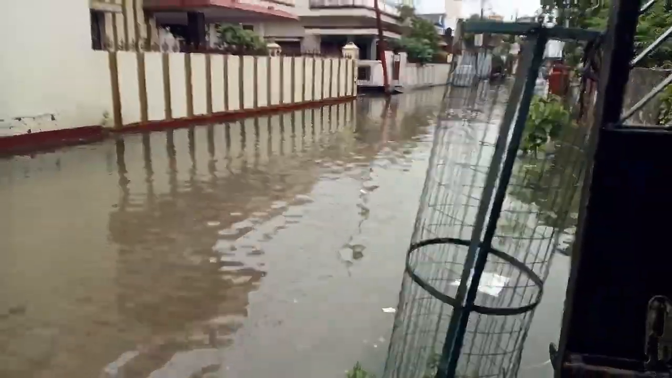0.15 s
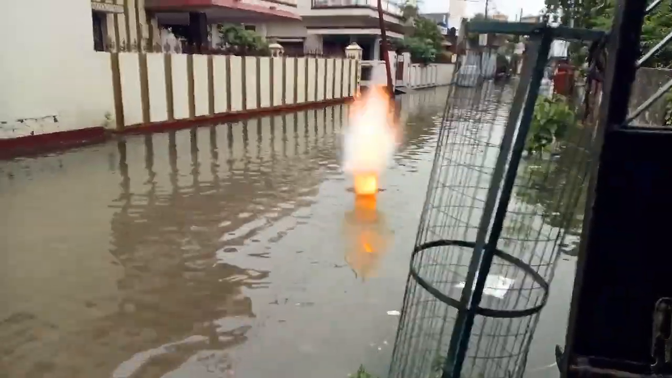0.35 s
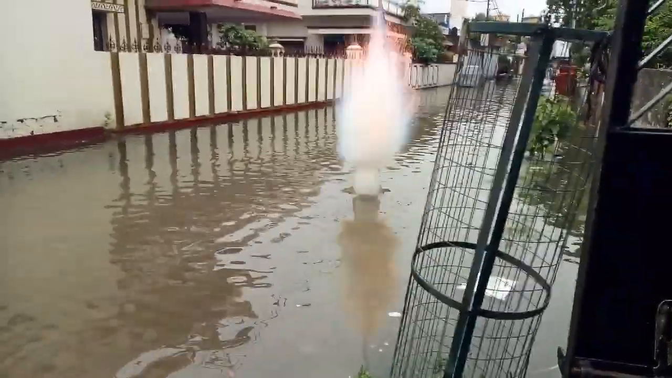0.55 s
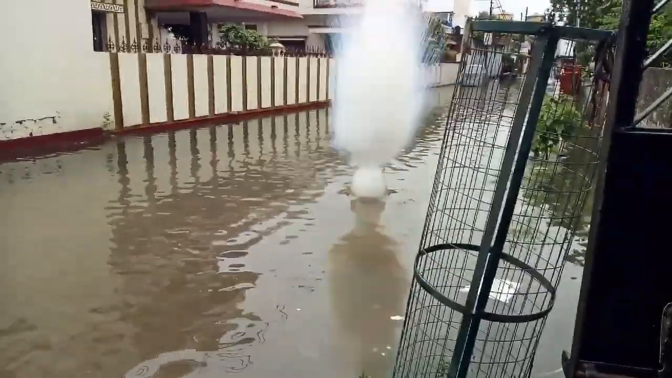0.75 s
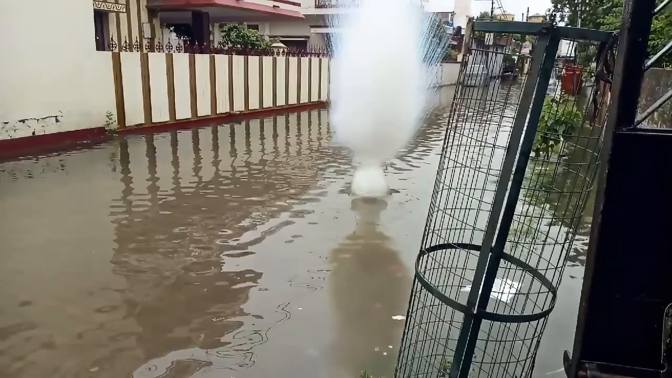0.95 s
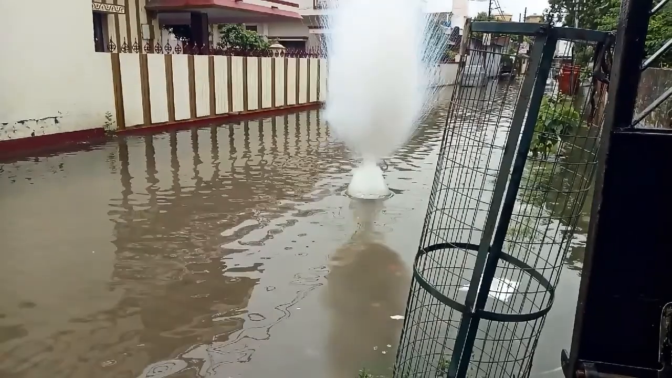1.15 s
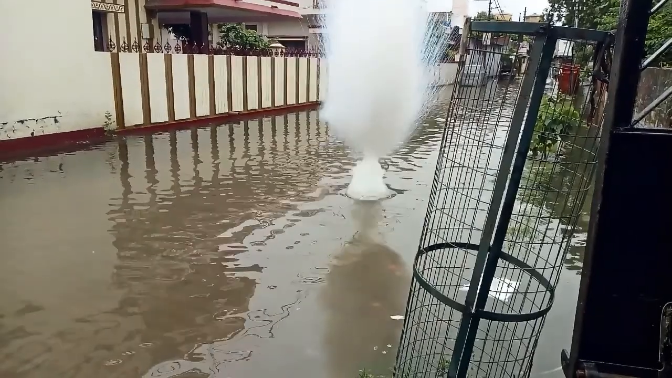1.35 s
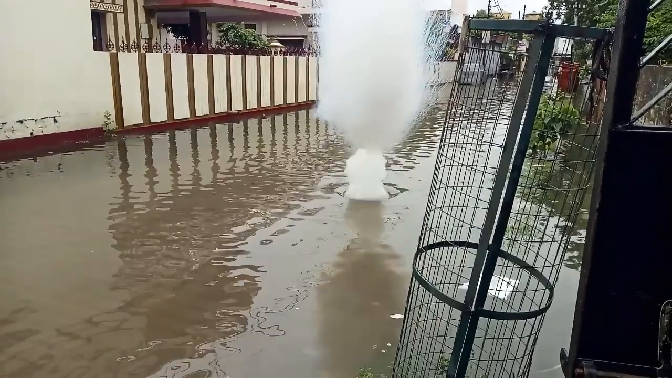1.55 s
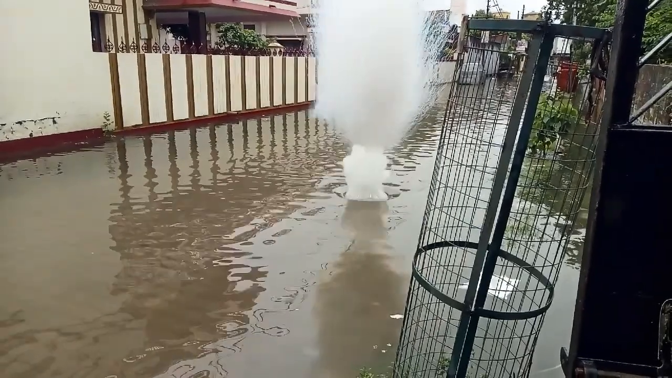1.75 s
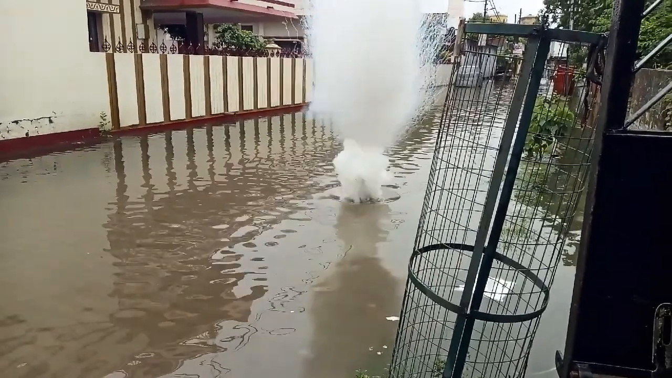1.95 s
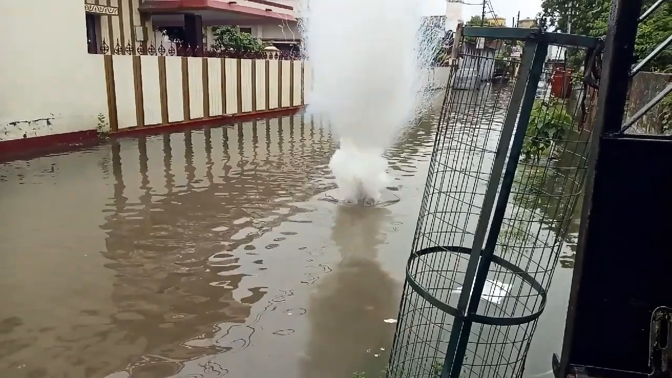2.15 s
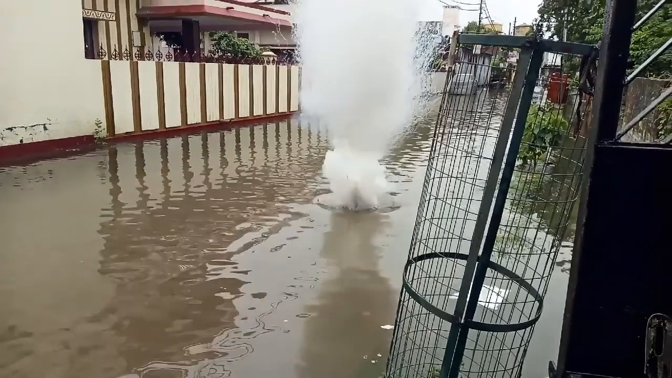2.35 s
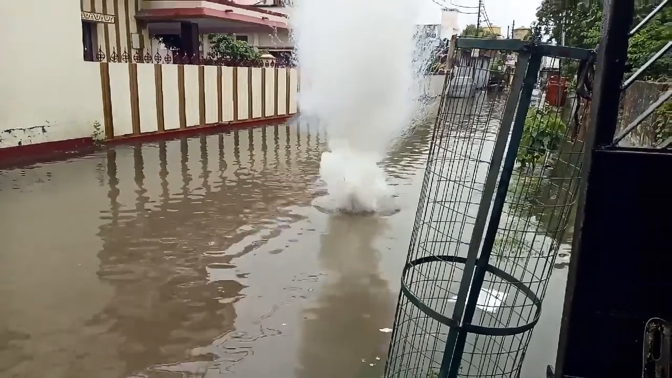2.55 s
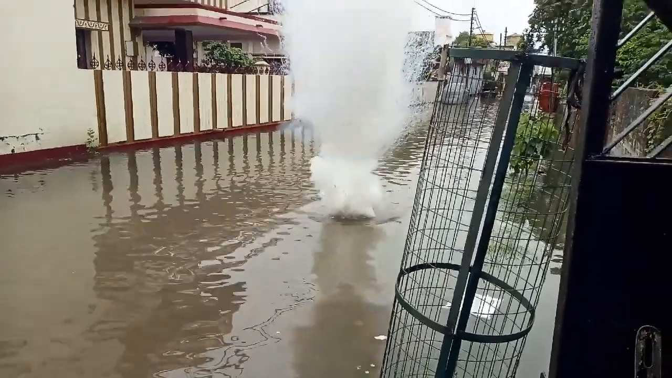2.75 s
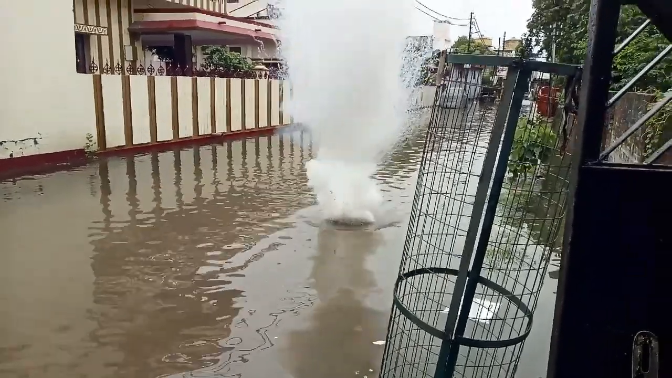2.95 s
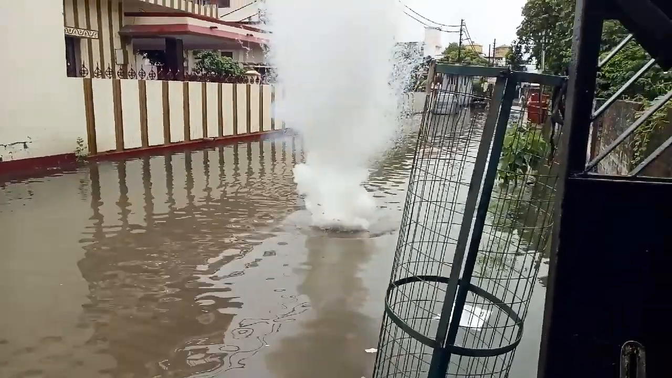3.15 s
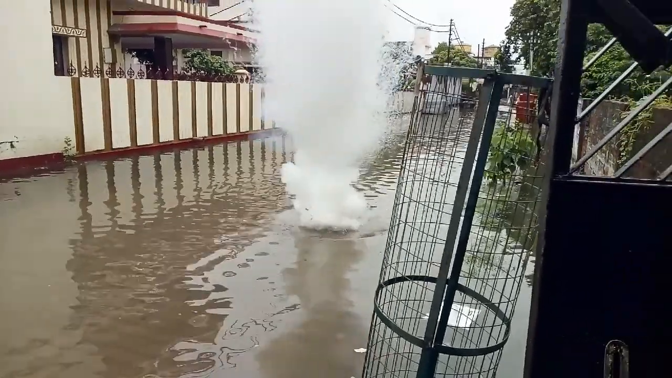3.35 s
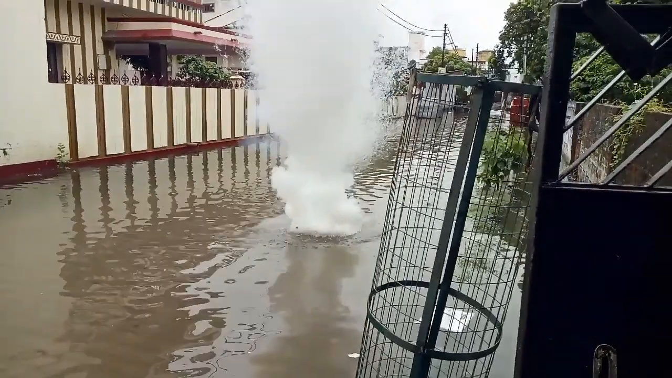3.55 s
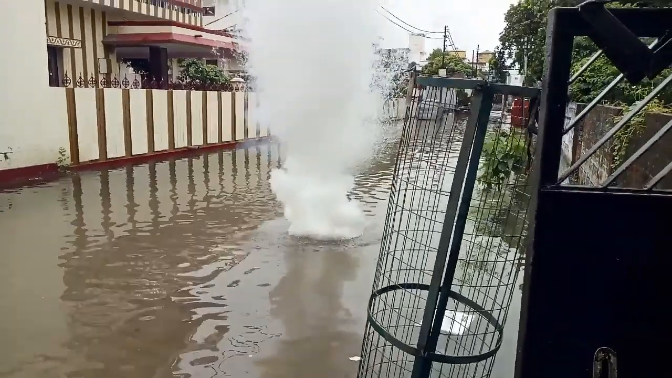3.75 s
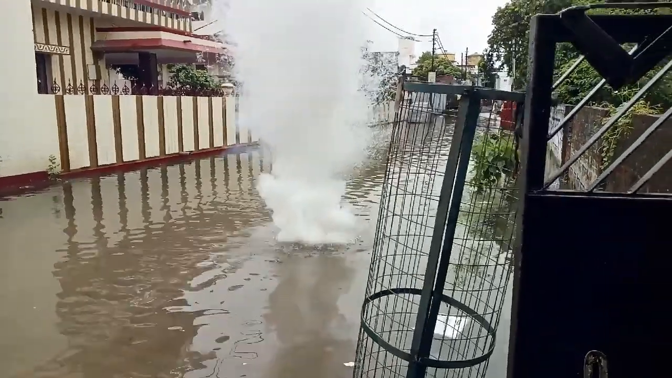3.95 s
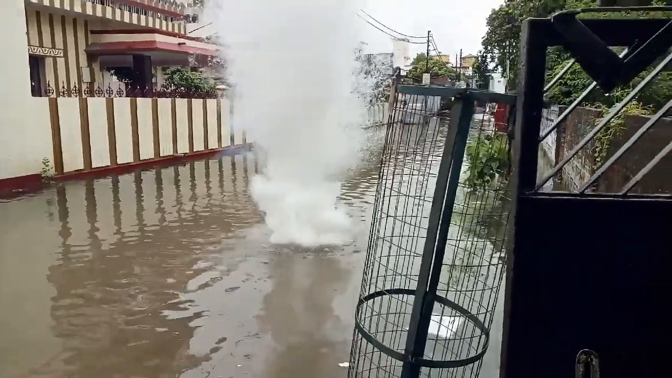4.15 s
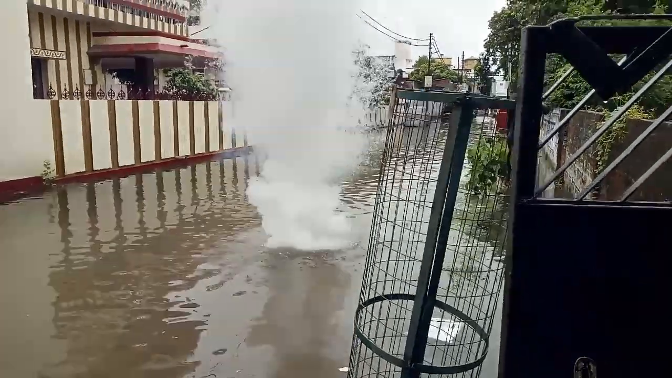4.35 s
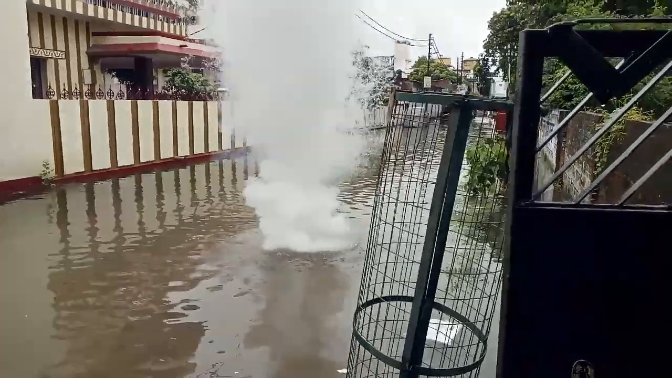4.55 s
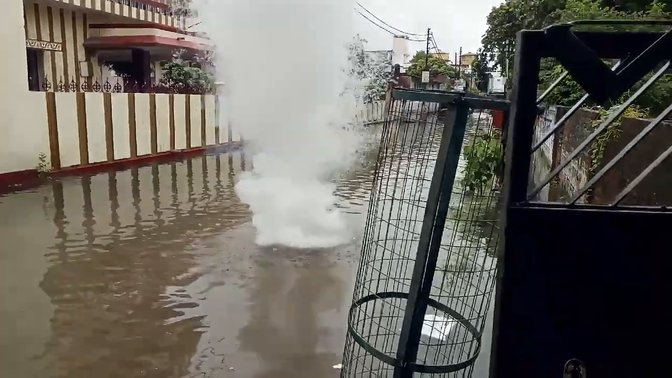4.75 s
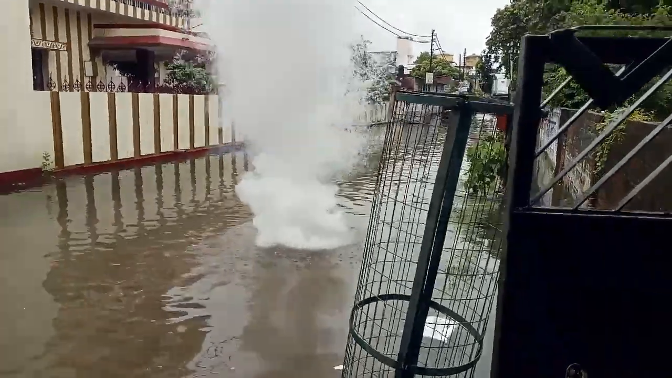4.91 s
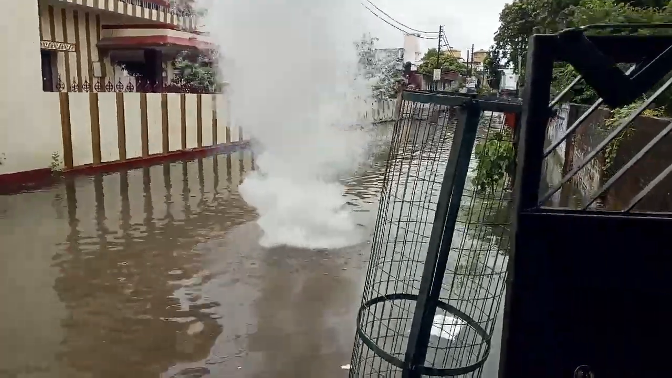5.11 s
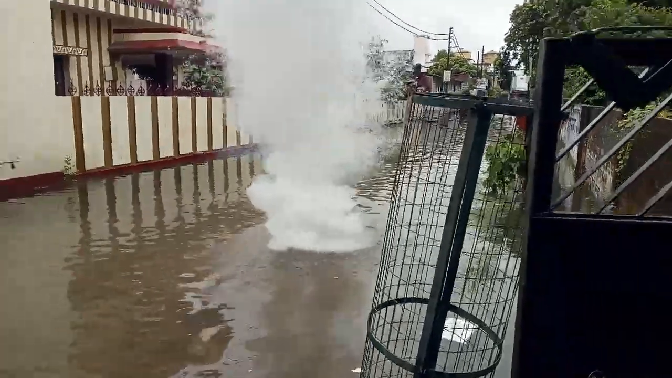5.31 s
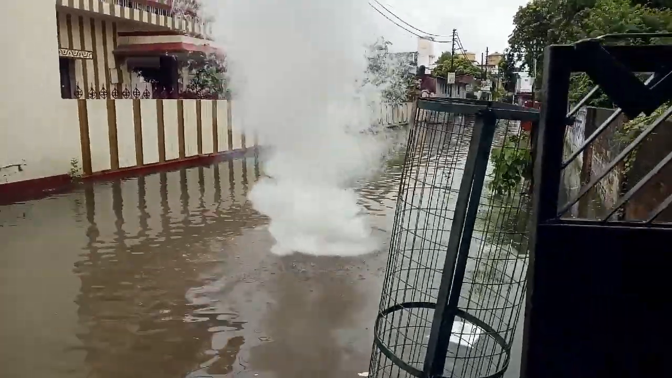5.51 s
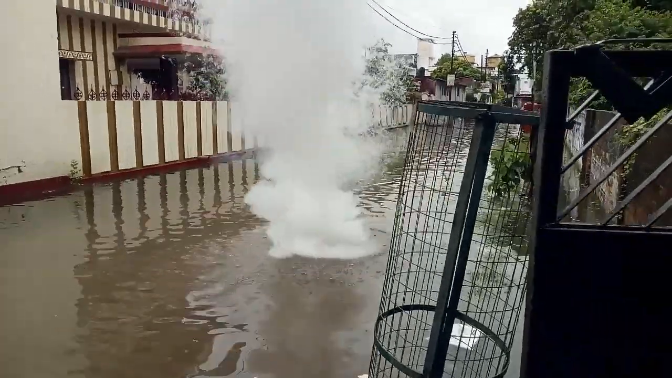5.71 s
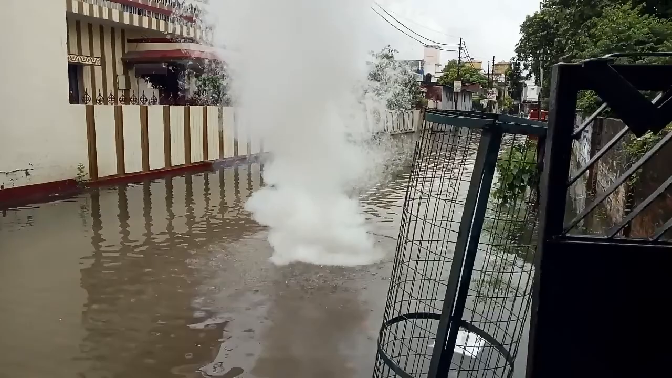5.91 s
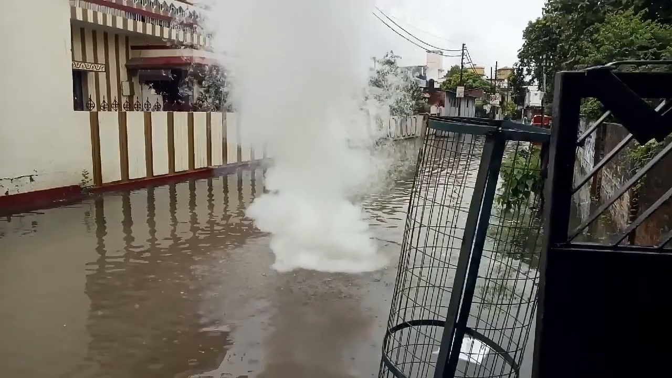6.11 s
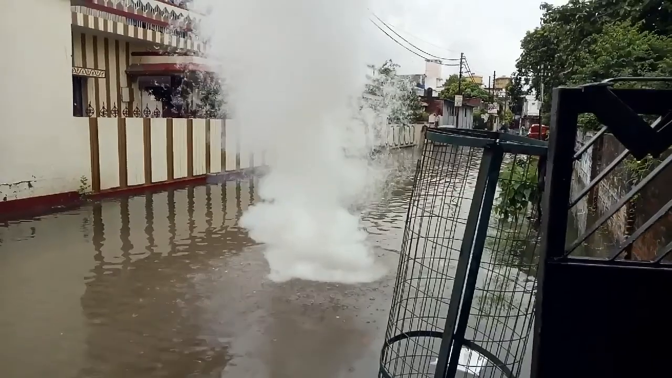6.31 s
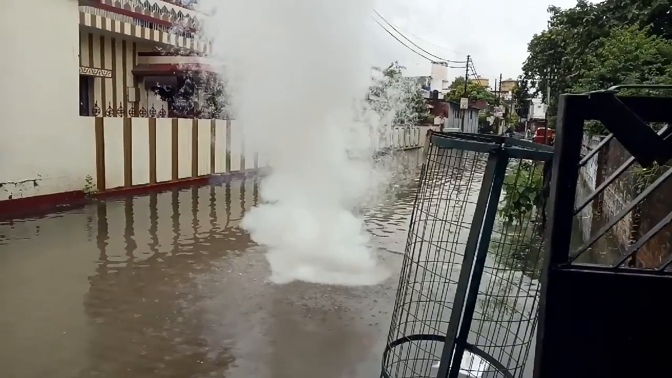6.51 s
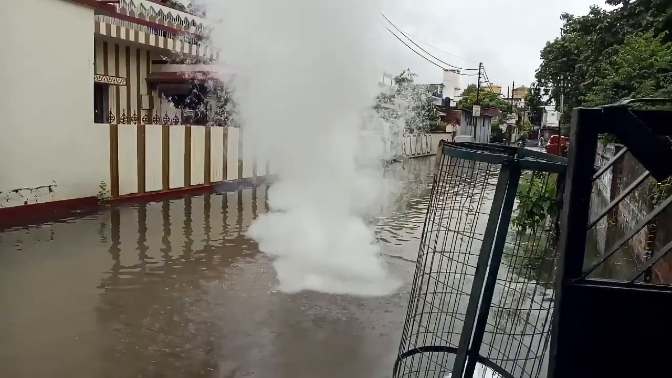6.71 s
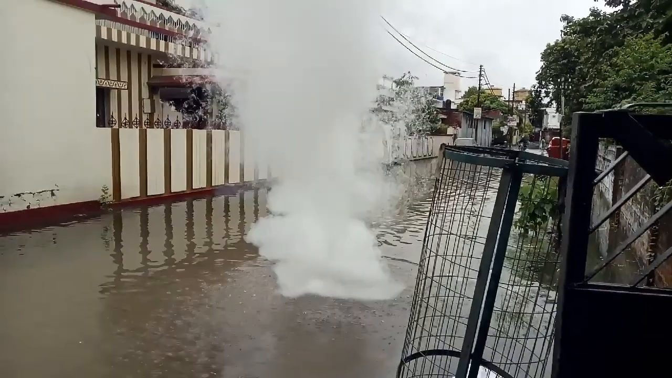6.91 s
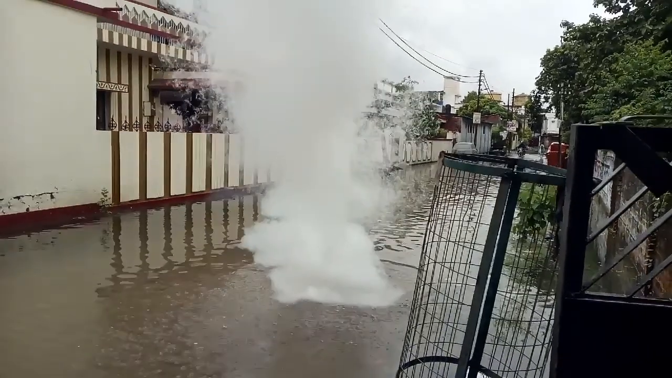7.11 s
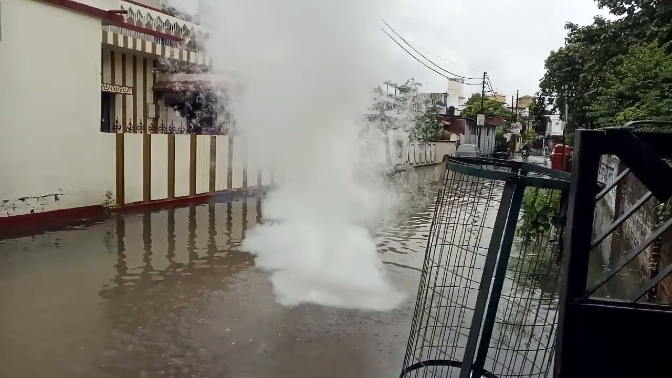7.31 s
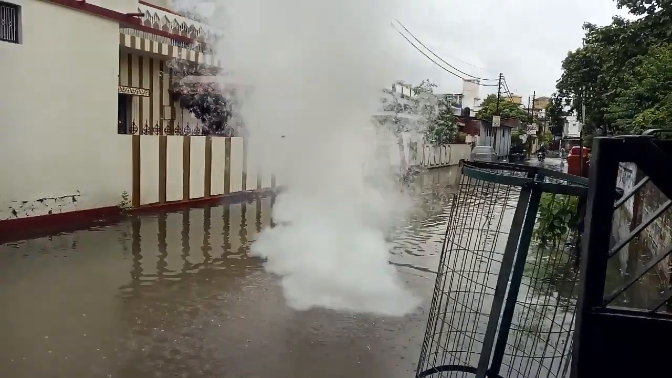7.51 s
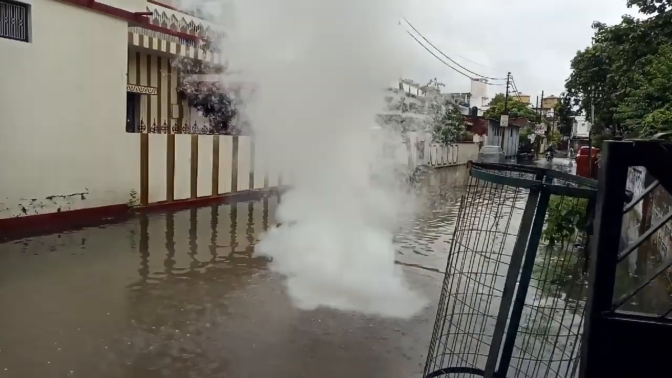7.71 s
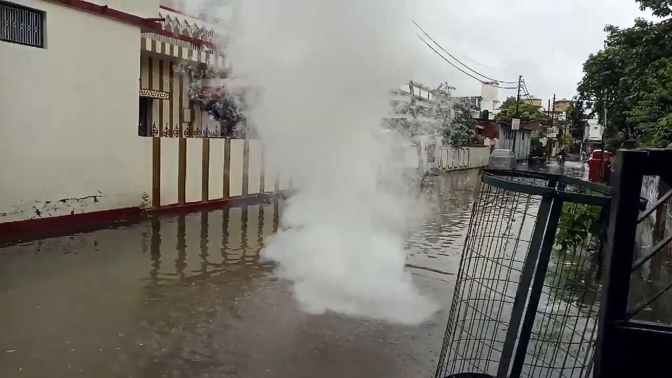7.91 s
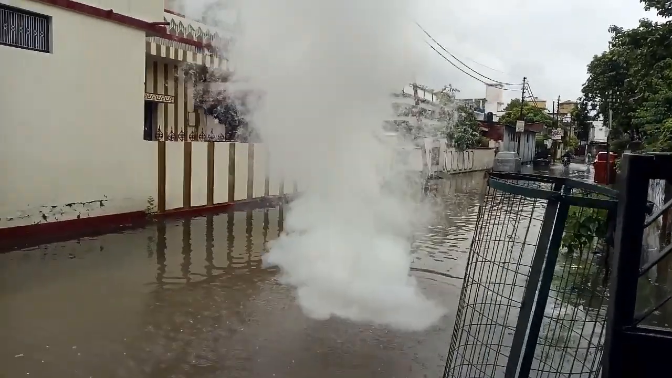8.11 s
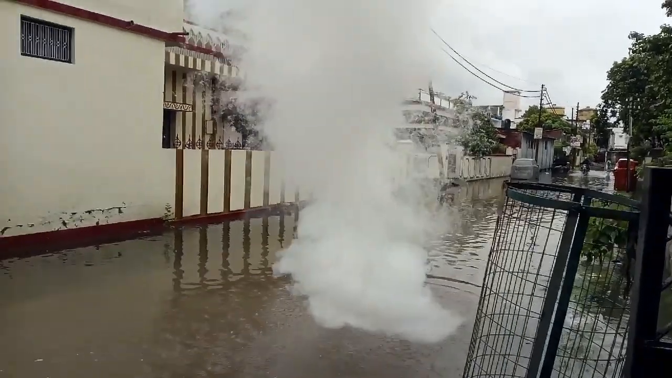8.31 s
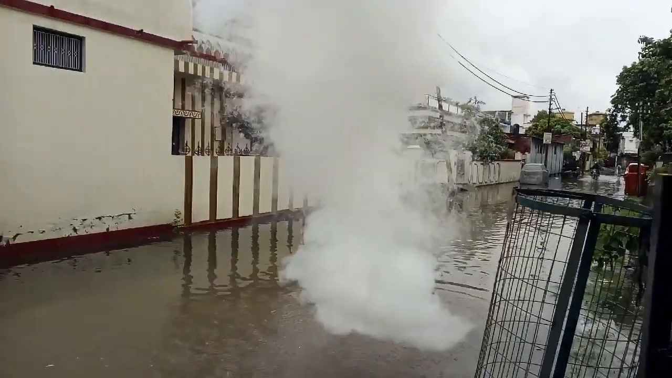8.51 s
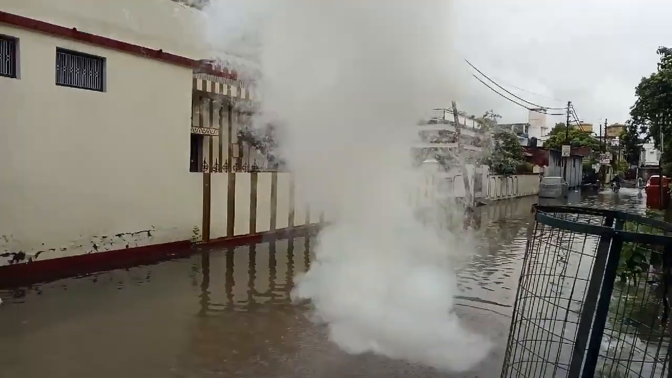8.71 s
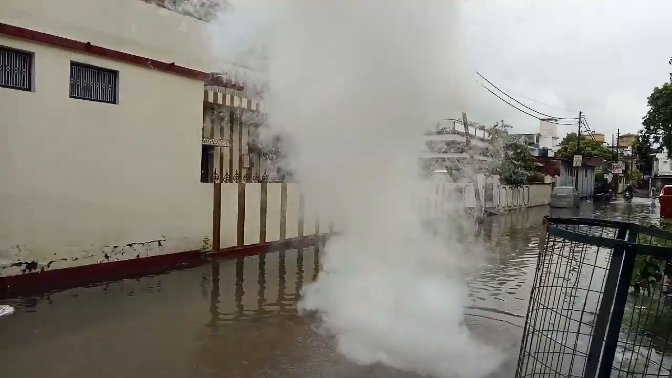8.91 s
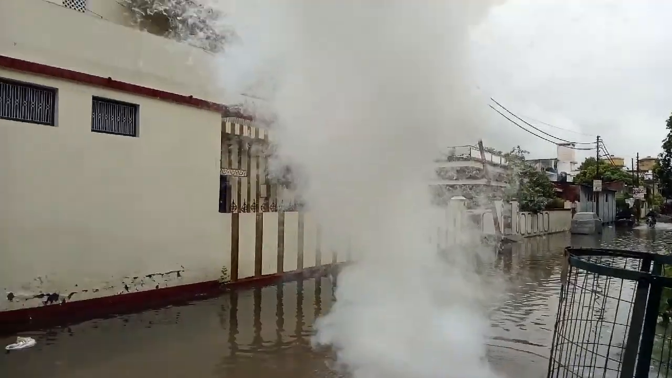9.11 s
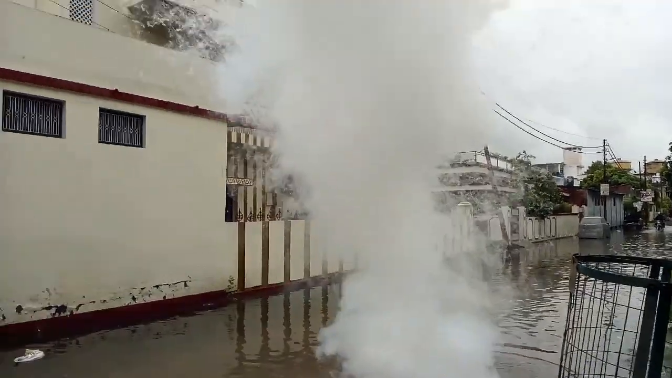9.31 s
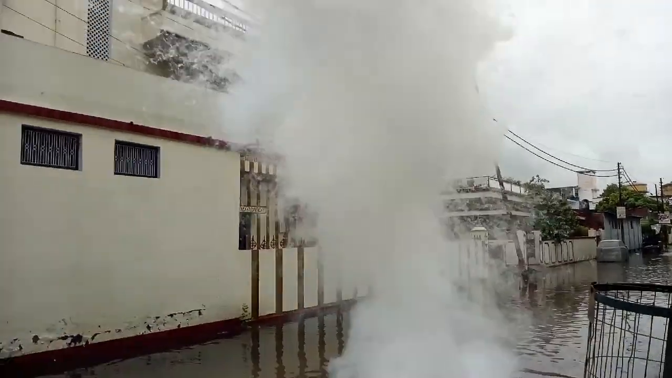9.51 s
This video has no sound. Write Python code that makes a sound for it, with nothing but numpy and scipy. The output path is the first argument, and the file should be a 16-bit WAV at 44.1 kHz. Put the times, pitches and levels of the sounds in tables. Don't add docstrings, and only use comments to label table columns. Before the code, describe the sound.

Slow-motion sound of an explosion on a flooded street between walls. From 0 to 0.33 s there is only very quiet, dull air, faint low hum and two soft low bubbles. A small pressure push arrives, then at about 0.35 s a shock slams in, overloading the microphone with flat, lurching bass thuds and harsh distortion until roughly 0.55 s. A dense, lumpy boom and roar stays very loud to about 0.8 s, then rolls away; the crackle goes first, leaving dark rumble, with a faint echo swell near 3.85 s, almost gone by 5 s. From about 5 s single drops plop, and after 6.2 s a soft uneven patter and splashing wash grows, with hollow rising water plops around 1 kHz, small dry ticks on wire and low bubbles near 6.1, 7.8-8.4 and 9.3 s. It ends quietly around 9.5 s.

```python
import sys
import numpy as np
from scipy import signal
from scipy.fft import rfft, irfft, next_fast_len
from scipy.io import wavfile
from scipy.ndimage import uniform_filter1d, map_coordinates

SR = 44100
rng = np.random.default_rng(int(sys.argv[2]) if len(sys.argv) > 2 else 0)


def to_wav(sig):
    pcm = np.clip(np.atleast_2d(sig), -1, 1) * 32767
    pcm = np.round(pcm).astype(np.int16)
    wavfile.write(sys.argv[1], SR, pcm.T)


def boost_factor(decibels):
    exponent = np.asarray(decibels, float) / 20
    return 10 ** exponent


N = 421596


def unit(x):
    return x / np.sqrt(np.mean(x ** 2) + 1e-20)


def along(points, hz):
    point_hz, level_db = np.transpose(points)
    return boost_factor(np.interp(np.log(hz + 1), np.log(point_hz + 1), level_db))


def curves(rows):
    time_s, *columns = np.transpose(rows)
    return [np.interp(np.arange(N) / SR, time_s, column) for column in columns]


def wobble(rate):
    knots = rng.standard_normal(int(N * rate / SR) + 4)
    return map_coordinates(knots, [np.arange(N) * rate / SR])


def filtered(x, response):
    m = next_fast_len(N + SR // 2)
    return irfft(rfft(x, m) * response(np.fft.rfftfreq(m, 1 / SR)), m)[:N]


def under(hz, edge_hz):
    return 1 / (1 + (hz / edge_hz) ** 12)


def between(hz, low_hz, high_hz):
    return np.sqrt(np.abs(under(hz, high_hz) - under(hz, low_hz)))


def split(x, edges_hz):
    return [unit(filtered(x, lambda hz: between(hz, low_hz, high_hz)))
            for low_hz, high_hz in zip(edges_hz, edges_hz[1:])]


def fade(t0, t1):
    return np.clip((np.arange(N) / SR - t0) / (t1 - t0), 0, 1)


def patchy(depth_db, wide, long):
    z = signal.stft(rng.standard_normal(N), nperseg=2048)[2]
    field = uniform_filter1d(rng.standard_normal(z.shape), wide, 0)
    field = uniform_filter1d(field, long, 1)
    return signal.istft(z * boost_factor(depth_db * unit(field)), nperseg=2048)[1][:N]


def street():
    # freq_hz, level_db
    air_tone = [(12, -19.5), (25, -3), (86, -6), (140, -10), (330, -14.5), (520, -6), (750, -15),
                (1400, -17), (1900, -29.5), (2700, -27), (4000, -53), (5200, -80)]
    # time_s, level_db
    air_level = [(0, -49), (.15, -49), (.33, -46), (5, -49.5), (9.56, -54)]
    air = filtered(rng.standard_normal(N), lambda hz: along(air_tone, hz))
    hum = filtered(rng.standard_normal(N), lambda hz: 1 / (1 + ((hz - 36) / 9) ** 2))
    air_db = curves(air_level)[0] + 0.43 * wobble(4.7)
    return boost_factor(air_db) * unit(air) + boost_factor(-58.5) * unit(hum)


def bubbles():
    # start_s, length_s, start_hz, end_hz, level_db
    plinks = [
        (.01, .3, 175, 175, -59.5),
        (.01, 0.34, 337, 322, -54.5),
        (6.12, 0.2, 119.7, 120, -50.5),
        (7.76, 0.14, 272, 280, -50.5),
        (7.9, 0.4, 168.4, 174.2, -47.5),
        (8.44, .1, 167, 170, -49),
        (9.308, 0.14, 279, 312, -44),
    ]
    out = np.zeros(N + SR)
    for start_s, length_s, start_hz, end_hz, level_db in plinks:
        u = np.arange(int(length_s * SR)) / (length_s * SR)
        phase = 2 * np.pi * length_s * (start_hz * u + (end_hz - start_hz) * u * u / 2)
        tone = np.sin(phase + .5 * wobble(26)[:len(u)])
        out[round(start_s * SR):][:len(u)] += boost_factor(level_db) * np.sin(np.pi * u) ** 0.34 * tone
    return out[:N] * boost_factor(2.5 * wobble(22))


def blast():
    # freq_hz, level_db
    echo_tone = [(12, -28), (20, -0.5), (92, 1.5), (135, 2.5), (172, 1), (286, 1.5), (390, -3.5),
                 (581, -7.5), (906, -20), (1410, -21.5), (2100, -36), (2570, -30.5), (4000, -52),
                 (5200, -89), (8800, -120)]
    # time_s, level_db
    pressure = [(.56, -10), (.8, -8.5), (1.4, -18), (2.25, -20.5), (3.2, -27), (3.7, -33), (4.4, -37),
                (5.1, -47.5), (5.9, -57)]
    # level_db over the pressure, share of its fall, drift_db_per_s once only far walls answer
    registers = [
        (-5.5, 1.0623, -0.8),
        (0.7, 1.093, -1.13),
        (-4, 1.297, -0.2),
        (-17, 1.595, -22.5),
    ]
    # start_s, length_s, size in full scales
    swings = [
        (.3465, .003, -2.5),
        (.369, .007, -3),
        (.3835, .006, 2.5),
        (.4275, .024, -3.3),
        (.452, .007, -2.5),
        (.466, .007, 2.5),
        (.5175, .007, -3),
    ]
    # start_s, length_s, level_db
    far_wall = (3.848, 0.032, -33)
    onset_s, far_walls_s = .3452, 2.03
    excess_db, excess_hold_s, excess_fade_s = 5.5, 0.21, 0.24
    t = np.arange(N) / SR

    lumps = boost_factor(0.29 * wobble(90))
    air = filtered(lumps * patchy(depth_db=1.5, wide=2, long=3), lambda hz: along(echo_tone, hz))
    bands = split(air, [1e-3, 130, 750, 1800, 1e6])
    pressure_db, = curves(pressure)
    peak_db = pressure_db.max()
    excess_end_s = onset_s + excess_hold_s
    excess = excess_db * (1 - fade(excess_end_s, excess_end_s + excess_fade_s))
    far_s = np.maximum(t - far_walls_s, 0)
    roll = np.zeros(N)
    for (level_db, share, drift_db), band in zip(registers, bands):
        band_db = peak_db + share * (pressure_db - peak_db) + level_db + drift_db * far_s + excess
        roll += boost_factor(band_db) * band
    roll *= fade(onset_s, onset_s + 0.0001) * (1 - fade(6.2, 6.3))

    for start_s, length_s, size in swings:
        u = np.clip((t - start_s) / length_s, 0, 1)
        roll += size * fade(start_s, start_s + .0007) * (1 - u) ** .45

    start_s, length_s, level_db = far_wall
    swell = np.sin(np.pi * np.clip((t - start_s) / length_s, 0, 1))
    late = boost_factor(level_db) * swell * (bands[1] + .15 * bands[2])
    forerunner = (.05 * fade(.3305, .3335) + .07 * fade(.332, onset_s)) * (t < onset_s)
    return roll + late + forerunner


def crater_rings():
    when, pitch, size = rng.random((3, 500))
    t = np.arange(SR // 4) / SR
    decay = boost_factor(10 * size[:, None] - 60 * t / 0.35)
    tone = np.sin(2 * np.pi * (700 + 800 * pitch[:, None]) * t * (1 + .04 * t))
    rings = decay * tone * (1 - np.exp(-t / 0.004))
    start = ((4.8 + 4.8 * when) * SR).astype(int)
    places = start[:, None] + np.arange(len(t))
    return np.bincount(places.ravel(), rings.ravel(), N + SR)[:N]


def spray():
    # time_s, downpour_db, fineness (-1 to 1)
    cloud = [(4.8, -55, -0.66), (5.5, -61, -0.57), (6.1, -58, 0.16), (6.3, -51.5, 0.1), (6.9, -52, 0.67),
             (7.25, -48, .1), (7.8, -48, .2), (8.2, -53, -0.51), (8.5, -47, -0.17), (8.9, -51, -0.38),
             (9.56, -50.5, -0.14)]
    # level_db over a full downpour, share of its swings, tilt_db per fineness
    drop_sizes = [
        (-2.06, 0.99, -11.5),
        (-1.34, 0.65, 3.5),
        (-11, 0.47, -1),
        (-0.14, 0.58, 1.5),
    ]
    # freq_hz, level_db
    patter_tone = [(500, -9), (680, -3.5), (850, -3.5), (990, -2), (1150, -7.5), (1250, -7.5), (1345, -6),
                   (1450, -12), (1650, -13.5), (1900, -23), (2700, -17.5), (3300, -25), (3900, -19.5),
                   (4300, -60)]
    # freq_hz, level_db
    splash_tone = [(59, -54), (100, -3.5), (167, 0.5), (205, -0.5), (280, -1.5), (469, -3.5), (900, -9),
                   (1170, -39), (1980, -120)]
    full_db = -50
    pour_db, fineness = curves(cloud)
    *patter_db, splash_db = [full_db + level_db + share * (pour_db - full_db) + tilt_db * fineness
                             for level_db, share, tilt_db in drop_sizes]

    crowd = crater_rings()
    wash = boost_factor(0.55 * wobble(45)) * unit(patchy(depth_db=2.2, wide=2, long=8))
    patter = filtered(.14 * unit(crowd) + wash, lambda hz: along(patter_tone, hz))
    bands = split(patter, [1e-3, 1150, 1850, 1e6])
    slaps = boost_factor(1.9 * wobble(52)) * patchy(depth_db=2, wide=2, long=4)
    splash = filtered(slaps, lambda hz: along(splash_tone, hz))
    fall = sum(boost_factor(level_db) * band for level_db, band in zip(patter_db, bands))
    return fade(3.85, 5.8) * (fall + boost_factor(splash_db) * unit(splash))


def resonance(hz, centre_hz, width_hz):
    return 1j * hz * width_hz / (centre_hz ** 2 - hz ** 2 + 1j * hz * width_hz)


def drops():
    # start_s, peak_db, pitch_hz
    plops = [(5.025, -41, 759), (5.186, -36.5, 940), (5.35, -49, 895), (5.513, -41, 935),
             (5.866, -45, 1270), (6.097, -47, 1150), (6.227, -29.5, 1280), (6.364, -32.5, 1320),
             (6.49, -37.5, 1360), (6.699, -31, 1274), (7.103, -37, 1280), (7.184, -52, 982),
             (7.267, -28.5, 980), (7.464, -32, 1280), (7.585, -32, 1130), (7.617, -40, 1080),
             (7.645, -38, 891), (7.793, -40, 1300), (7.892, -39, 1270), (7.921, -32, 1000),
             (8.292, -44, 893), (8.468, -27.5, 975), (9.057, -32, 950), (9.166, -35, 1020),
             (9.338, -40, 1390), (9.473, -32.5, 713)]
    # start_s, peak_db, body_db
    wire_hits = [(5.1946, -47, 0), (5.2365, -53, 17), (5.3178, -51, 12), (6.1779, -53, 6),
                 (6.2468, -50, 29), (6.2537, -46, 12), (7.104, -41, 2), (7.112, -35.5, 8),
                 (7.1314, -41, 12), (7.266, -47, 6), (7.3317, -52, 8), (7.6182, -45, 22), (7.627, -43, 5),
                 (7.6565, -55, 11), (8.3807, -51, 11), (8.4108, -59.5, 12), (8.4692, -48, 21),
                 (8.477, -48, 15), (8.608, -50, 26), (9.058, -53, 20), (9.1731, -48, 14), (9.3355, -46, 21),
                 (9.342, -46, 25)]
    rings, ticks, knocks = np.zeros((3, N + SR))
    t = np.arange(SR // 20) / SR
    for start_s, peak_db, pitch_hz in plops:
        tone = np.sin(2 * np.pi * pitch_hz * t * (1 + 1.4 * t))
        ring = boost_factor(peak_db - 60 * t / 0.043) * tone * (1 - np.exp(-t / 0.0011))
        rings[round(start_s * SR):][:len(t)] += ring
    for start_s, peak_db, body_db in wire_hits:
        decay = boost_factor(peak_db - 60 * t / 0.016) + boost_factor(peak_db - 12 - 60 * t / 0.11)
        tick, knock = decay * rng.standard_normal((2, len(t)))
        ticks[round(start_s * SR):][:len(t)] += tick
        knocks[round(start_s * SR):][:len(t)] += boost_factor(body_db) * knock
    wire = filtered(ticks[:N], lambda hz: boost_factor(6.5) * (resonance(hz, 2750, 1300)
                                                      + 1.2 * resonance(hz, 2700, 250)))
    body = filtered(knocks[:N], lambda hz: boost_factor(3.0) * between(hz, 680, 1420))
    return rings[:N] + wire + body


def scene():
    return (street() + bubbles() + blast() + spray() + drops())[None]


def squash(x, top, hard):
    return x / (1 + np.abs(x / top) ** hard) ** (1 / hard)


def bass_cut(hz):
    return -hz ** 2 / (19 ** 2 - hz ** 2 + 1.5j * hz * 19) / (1 + (hz / 3600) ** 4)


def slow_down(x):
    hold_hz = 11997.4
    held = np.floor(np.arange(N) * hold_hz / SR) * SR / hold_hz
    return map_coordinates(x, [held], order=3)


def low_pass(x):
    return signal.sosfilt(signal.butter(12, 16500, fs=SR, output="sos"), x)


def record(dry):
    x = squash(dry[0], top=1.3, hard=3)
    x = filtered(x, bass_cut)
    x = squash(1.04 * x, top=1, hard=9)
    x = filtered(x, lambda hz: 1 / (1 + (hz / 3950) ** 24))
    x = slow_down(x)
    x = filtered(x, lambda hz: 1 / (1 + (hz / 15750) ** 200))
    return low_pass(x[None])


dry = scene()
out = record(dry)
to_wav(out)
```